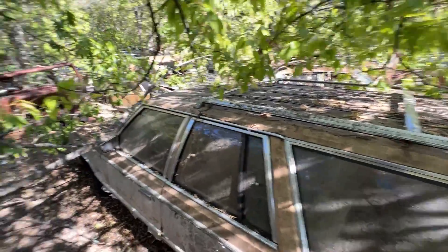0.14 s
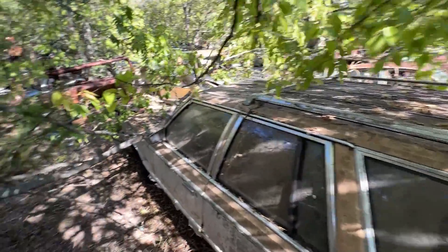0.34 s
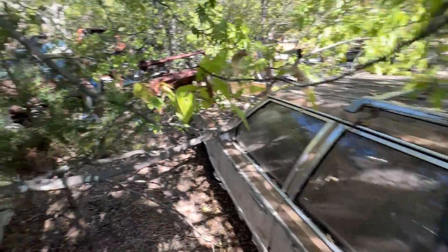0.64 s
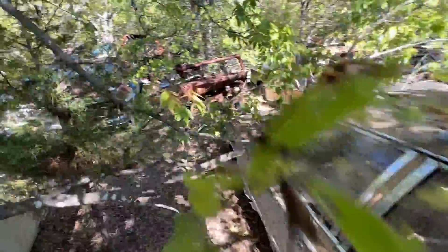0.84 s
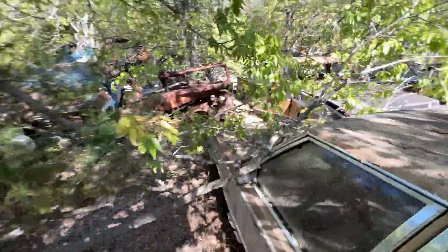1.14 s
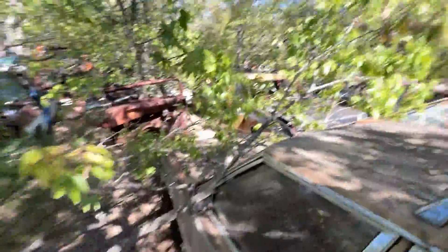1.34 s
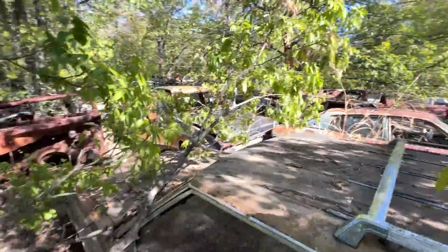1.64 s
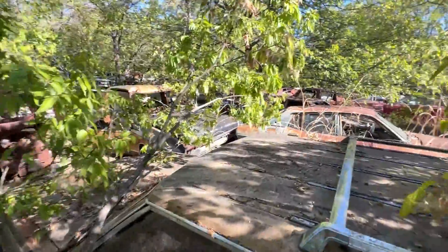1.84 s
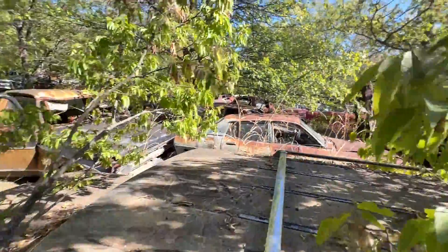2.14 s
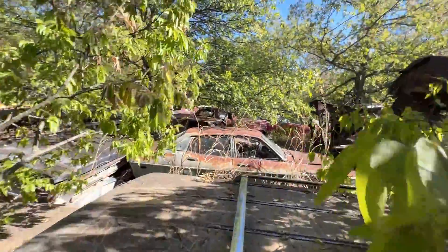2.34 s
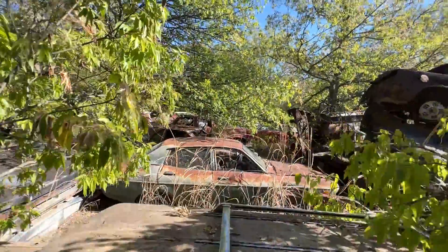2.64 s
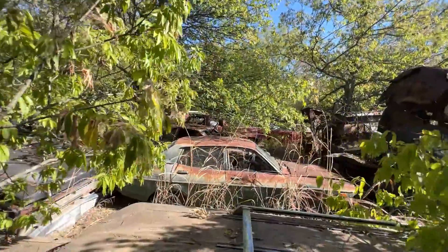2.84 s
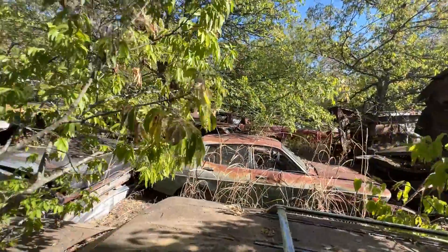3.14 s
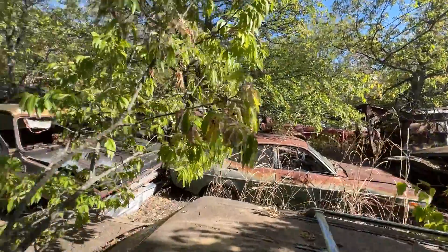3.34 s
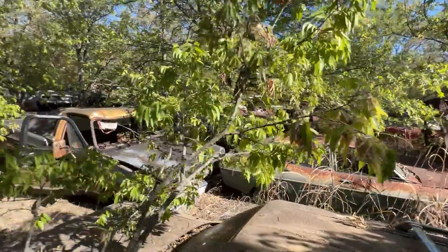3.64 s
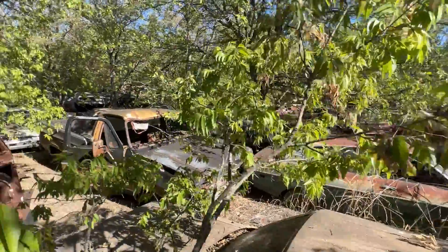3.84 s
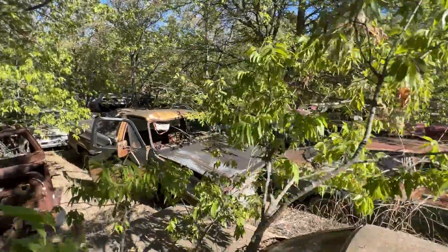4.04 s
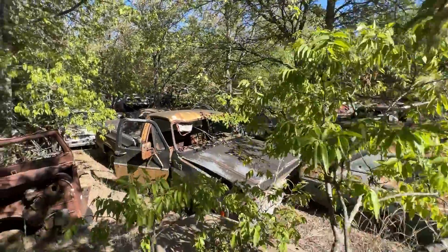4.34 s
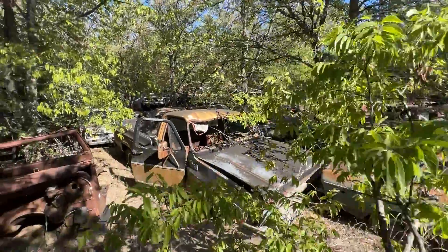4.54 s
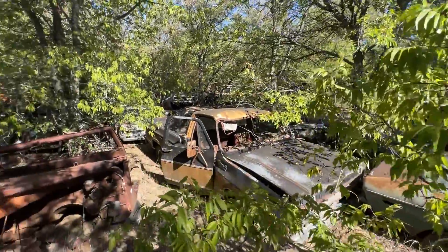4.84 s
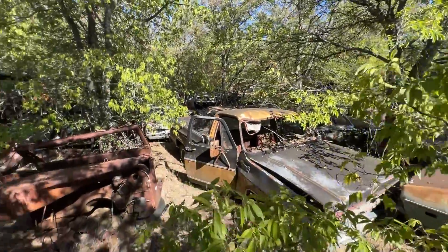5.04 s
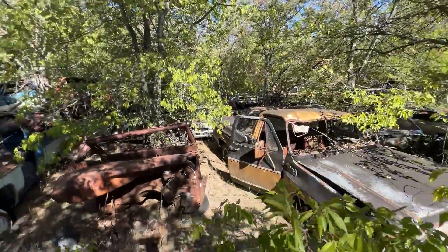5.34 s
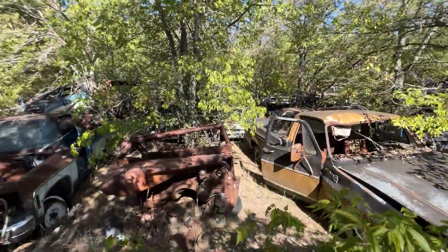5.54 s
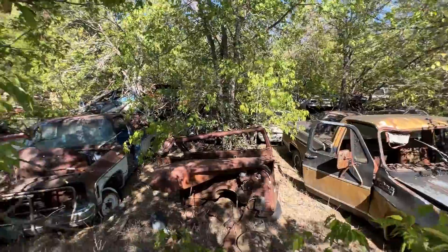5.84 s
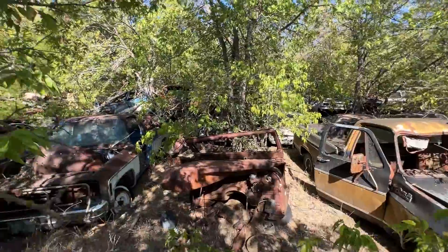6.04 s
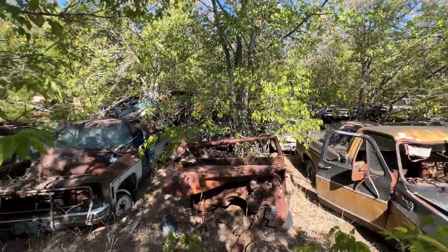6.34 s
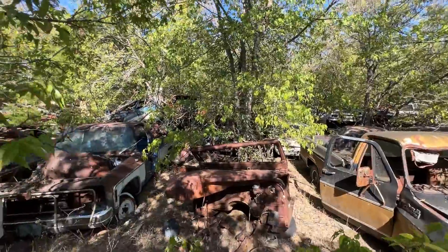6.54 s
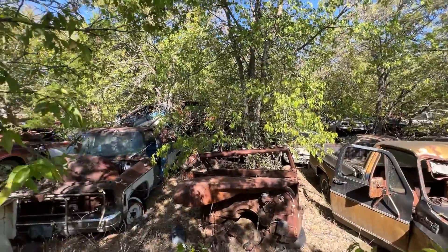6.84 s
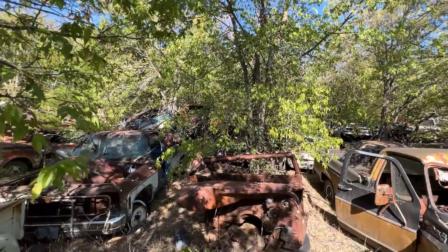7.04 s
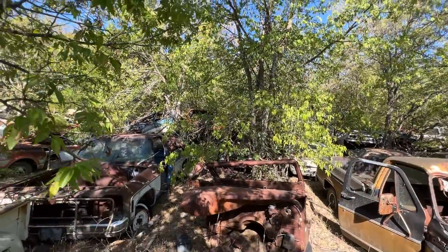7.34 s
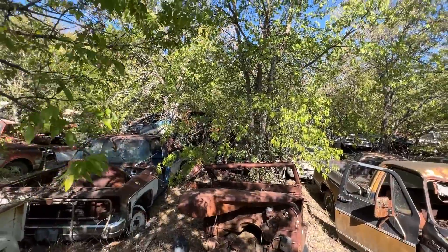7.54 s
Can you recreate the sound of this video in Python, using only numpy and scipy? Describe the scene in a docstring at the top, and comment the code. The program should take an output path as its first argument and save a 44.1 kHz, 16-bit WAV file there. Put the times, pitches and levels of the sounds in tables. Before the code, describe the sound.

Busy crackling foliage and crunching steps with knocking branches and brittle twig snaps, thinning into sparser rustles, outdoors and close to the microphone.

```python
"""An overgrown yard with wrecked cars: someone pushes through bushes, walking on dry leaves.
Leaves rustle and crackle as streams of tiny ringing clicks, coloured from crisp to crunchy over soft treads.
Twigs snap as noise bursts with a sharp tone; branches knock as damped resonances of noise.
A car panel and something hollow ring as sets of decaying modes, over quiet yard air.
The hand-held recorder has two unlike ports; most of the sound comes from the right."""
import sys
import numpy as np
from scipy import signal
from scipy.fft import rfft, irfft, next_fast_len
from scipy.io import wavfile

SR = 44100
rng = np.random.default_rng(int(sys.argv[2]) if len(sys.argv) > 2 else 0)


def int16_out(signal):
    """Quantize to a 16-bit WAV file."""
    q = np.round(np.clip(np.atleast_2d(signal).T, -1, 1) * 32767)
    wavfile.write(sys.argv[1], SR, q.astype(np.int16))


N = 339127

# Event levels are relative: the mix settings trim them, and the ports colour them.
# leaves that keep stirring between the strokes: time_s, level_db
STIRRING_BED = [(0, -59.5), (.1, -52), (.3, -42.5), (1.1, -50), (1.9, -51), (2.5, -51.5), (3.05, -52.5),
                (3.66, -55), (4.3, -52), (4.75, -55.5), (5.25, -53.5), (5.75, -52.5), (6.08, -54),
                (6.69, -60), (6.88, -61.5), (7.2, -54.5), (7.54, -64), (7.69, -60.5)]
# fine hiss of foliage close by, against the crisp rustle: time_s, level_db
FOLIAGE_HISS = [(0, -7.5), (1.35, -8.5), (1.7, -11.5), (2.6, -8), (2.82, -20), (3.1, -13), (4.03, -12),
                (5.35, -25), (6.3, -32), (6.78, -16), (7.69, -20)]
# a leafy branch sweeps past: start_s, level_db, rise_s, hold_s, t60_s,
# papery_db (large papery leaves against the crisp ones)
BRANCH_SWEEPS = [(0.105, -35, 0.12, 0.097, 1, -8), (0.4, -38, 0.044, 0.28, 1, -8),
                 (0.823, -38, 0.1, 0.098, 0.13, -7), (1.105, -48.5, 0.046, 0.045, 0.11, 1.5),
                 (1.25, -33.5, 0.0097, 0.095, .2, -12), (1.347, -27, 0.01, 0.015, 0.16, -13),
                 (1.428, -40, 0.084, 0.087, 0.86, -7.5), (1.642, -39, 0.034, 0.063, 0.87, -10),
                 (1.913, -43.5, 0.027, 0.033, .25, -11), (2.124, -46, 0.038, 0.053, .3, -5.5),
                 (2.219, -37.5, 0.037, 0.011, 0.45, -25), (2.764, -41.5, 0.031, 0.056, 0.45, -10),
                 (2.956, -46.5, .015, .02, 0.17, -6), (3.065, -44, .03, .01, 0.12, -8),
                 (3.177, -45, 0.029, 0.036, 0.13, -12), (3.313, -48, 0.1, 0.089, .5, -18),
                 (3.677, -49, 0.047, 0.41, 0.26, -8.5), (3.984, -36, 0.037, 0.031, 0.34, -7),
                 (4.09, -49.5, 0.028, 0.071, 0.99, -3.5), (5.006, -48, 0.018, 0.016, .2, -11),
                 (5.13, -52, .015, .05, 0.65, 5.5), (5.323, -33, 0.032, 0.025, .22, -8.5),
                 (6.116, -44, 0.028, 0.028, .3, -9), (6.184, -38.5, 0.043, 0.056, .4, -6.5),
                 (6.752, -49.5, 0.021, .012, 0.11, -2), (7.022, -47, 0.015, 0.015, 0.83, 1.5),
                 (7.257, -42, 0.025, 0.01, 0.28, -6.5), (7.432, -52.5, 0.029, .012, 0.14, -19)]
# a foot presses into the litter: start_s, crunch_db, rise_s, hold_s, t60_s,
# scuff_db (sole), tread_db (dull weight)
FOOTSTEPS = [(0, -71.5, 0.018, 0.081, 0.38, -69, -66.5), (0.11, -68, 0.15, 0.19, .7, -54.5, -77),
             (.42, -51, 0.06, 0.24, 1.1, -51.5, -67), (0.76, -51.5, 0.015, 0.33, 1.2, -51, -60.5),
             (1.148, -65, .03, 0.082, 0.42, -46, -57), (1.303, -33.5, 0.037, 0.025, 0.16, -48.5, -68),
             (1.414, -44.5, 0.016, 0.024, 0.58, -69, -65), (2.13, -49, 0.074, 0.084, 0.32, -58, -72),
             (2.32, -63.5, 0.034, 0.11, 0.15, -74, -70), (2.545, -56.5, 0.039, 0.054, 0.66, -62.5, -68),
             (2.883, -60, 0.015, 0.21, 1.8, -64.5, -63), (3.36, -55, 0.037, 0.037, 0.45, -64.5, -89),
             (3.978, -47, 0.024, 0.024, 0.8, -59.5, -70), (4.133, -52, .03, 0.057, .6, -61.5, -77),
             (5.288, -42, 0.056, 0.04, 0.33, -56, -63.5), (5.421, -49.5, 0.021, 0.27, 0.22, -78, -90),
             (5.86, -54, 0.036, 0.026, 0.36, -61.5, -86), (6.162, -48.5, 0.083, 0.05, .2, -65, -75),
             (6.3, -37.5, 0.018, 0.062, 0.54, -55, -70), (6.386, -41.5, 0.051, 0.13, 0.39, -51.5, -71),
             (6.73, -53, 0.042, 0.013, 0.14, -65, -71), (7.023, -56, 0.014, 0.058, 0.43, -65.5, -78),
             (7.264, -71, 0.02, .02, 0.34, -68, -75)]
# a bunch of leaves crushed at once: start_s, level_db, t60_s, tilt_db_per_octave
LEAF_CRUSHES = [(0.309, -34, 0.059, -1.5), (0.344, -22, 0.03, 11), (0.935, -26, 0.014, 17),
                (1.006, -22.5, 0.073, -1), (1.048, -23, 0.046, 1), (1.2453, -22.5, 0.064, -3.5),
                (1.344, -23, 0.14, 6.5), (3.101, -38, 0.092, 9), (3.826, -35, 0.055, 1),
                (5.325, -29.5, 0.026, 4), (5.628, -33, 0.025, -1.5), (6.146, -39, 0.094, 1),
                (6.293, -25, 0.036, -0.5), (7.028, -42, 0.27, 5.5)]
# branches knock, from bright flicks to dull thumps: start_s, level_db, pitch_hz
BRANCH_KNOCKS = [(0.309, -36, 1380), (0.675, -35, 890), (0.777, -20.5, 1700), (0.7794, -24.5, 710),
                 (0.783, -36.5, 297), (0.925, -26, 1900), (0.936, -23.5, 1860), (0.938, -27.5, 590),
                 (0.967, -38.5, 140), (1.009, -27.5, 1250), (1.012, -35, 424), (1.054, -25, 1350),
                 (1.115, -35, 1500), (1.190, -23.5, 2000), (1.194, -27, 241), (1.226, -31, 1030),
                 (1.231, -27, 900), (1.242, -31.5, 200), (1.248, -23, 610), (1.259, -27, 614),
                 (1.261, -28, 4070), (1.307, -28.5, 1570), (1.344, -25, 1250), (1.598, -38.5, 1080),
                 (3.107, -40, 1430), (2.112, -46, 3700), (3.185, -44.5, 1550), (3.289, -47.5, 3870),
                 (3.59, -46, 1160), (4.18, -38, 1250), (4.652, -44, 1060), (4.655, -50, 280),
                 (4.724, -38, 1350), (5.121, -23.5, 3340), (5.63, -35, 3700), (6.315, -34, 1510),
                 (7.205, -34, 3400)]
# twigs breaking: start_s, level_db, tilt_db_per_octave (limited when played)
TWIG_SNAPS = [(0.6721, -22.5, -4), (0.773, -11.5, 9), (0.778, -17.5, -5), (1.2586, -18, 9), (1.898, -31, 3),
              (1.992, -35, 3), (2.0522, -35, 5), (2.086, -37, -1), (2.8931, -19, -0.5), (2.9674, -25, -0.5),
              (3.182, -32.5, 8), (3.239, -28, -1), (3.884, -20, 2.5), (4.1385, -23.5, 0.5),
              (4.2244, -33, -3.5), (4.2936, -27.5, 4), (4.5015, -34.5, 5), (4.602, -33, 1),
              (4.7214, -31.5, -0.5), (4.8678, -40, 0), (4.8912, -34.5, 3), (5.012, -36, 9),
              (5.0618, -26, 4), (5.1005, -31, 3), (5.1215, -9, 2.5), (5.626, -27, 5), (6.3129, -23, -4.5),
              (7.205, -36, 0), (7.232, -31, 7), (7.458, -46, 1.5), (7.563, -40, 11), (7.6093, -45, -1)]
# bumps on a car's sheet metal: start_s, level_db
PANEL_BUMPS = [(2.62, -57.5), (2.893, -36), (2.969, -44.5), (3.107, -58), (3.238, -60), (7.11, -61)]
# modes of the sheet metal: pitch_hz, level_db, t60_s
PANEL_MODES = [(88.8, -29, 0.96), (129.7, -18, 0.28), (164.3, -4.5, 0.18), (185.4, -9, 0.35),
               (395, -9, 0.13), (431, -6, 0.2), (715, -8, .06), (810, 1, 0.065), (1020, -6, 0.075),
               (1447, 2, 0.061), (1866, 3, 0.045), (2755, 13.5, 0.026), (3620, 7, 0.032), (4200, -11, 0.03)]
# a foot coming down on something hollow: start_s, level_db
HOLLOW_THUDS = [(4.05, -32), (4.13, -48)]
# modes of the hollow body: pitch_hz, level_db, t60_s
HOLLOW_MODES = [(213, -21, 0.064), (333, -7, 0.078), (394, -13, 0.048), (481, -5, 0.091)]

# Spectra, relative because each coloured sound is levelled to rms 1: frequency_hz, level_db (per Hz)
# crisp small leaves
CRISP_SPECTRUM = [(2500, -54), (4000, -23), (5000, -1), (7000, 4.5), (9000, 8), (10000, -7.5),
                  (12000, -30.5)]
# large papery leaves
PAPERY_SPECTRUM = [(1500, -33), (2400, 2), (3500, 4), (4400, 0.5), (5500, -10), (7000, -13.5)]
# litter crunching underfoot
CRUNCH_SPECTRUM = [(450, -30.5), (800, -3.5), (1200, 2.5), (1700, 4.5), (2400, -10.5), (4000, -30)]
# fine foliage hiss
FINE_SPECTRUM = [(8500, -22), (10200, -2), (11500, -1), (13500, 1.5), (16000, -7)]
# scuffing soles
SCUFF_SPECTRUM = [(110, -11), (180, -1.5), (290, 3.5), (420, 0.5), (600, 0), (800, -2.5), (1100, -9),
                  (1800, -53)]
# dull weight of the feet
TREAD_SPECTRUM = [(20, -26), (50, 5.5), (85, 7), (130, 4), (210, -1), (300, -6), (600, -24)]
# breaking leaves and twig fibres
BREAKING_SPECTRUM = [(100, -19), (600, -7.5), (1400, -1.5), (2500, 0.5), (5000, 2), (8800, 9.5),
                     (10500, -4), (16000, -10.5)]
# background air of the yard
AIR_SPECTRUM = [(20, -13), (70, 5.5), (300, 8), (1200, 7), (3000, -15), (8000, -14), (16000, -18)]

# resonances of the left microphone port: frequency_hz, width_hz, level_db
LEFT_RESONANCES = [(5720, 1400, -6), (8000, 170, -27), (10100, 220, 1.5), (10530, 290, -9.5)]
# resonances of the right microphone port: frequency_hz, width_hz, level_db
RIGHT_RESONANCES = [(580, 40, 5), (1700, 490, 2.5), (5323, 145, -8), (5620, 110, 8), (7477, 161, -41),
                    (9750, 120, -11), (10800, 156, 5)]
# balance between the ports: frequency_hz, right_louder_db, likeness (0-1)
PORT_BALANCE = [(51.3, 1, 0), (150, 2, 0.17), (280, 0.5, 0.04), (517, -2.5, 0), (800, 0, 0.63),
                (1250, 3.5, 0.64), (2480, 3, 0), (5200, 10.5, 0.06), (5120, 8.5, 0.45), (8350, 8, 0.7),
                (8830, 0, 0), (11040, -5, 0.12), (11100, 3, 0.77), (13200, -2.5, 1), (15800, 3, 1)]
# phase between the ports: frequency_hz, left_leads_rad
PORT_PHASE = [(210, 3.1), (520, 2.4), (800, -.9), (1250, -.3), (4800, -1.4), (5900, -2.2), (7200, -1.7),
              (9200, -4.2), (11100, -.3), (12350, .1), (14200, 3.1), (15700, 4.3)]

CLICK_SPREAD_DB = 4.0
CRUSH_RISE_S = 0.0006
KNOCK_T60_S, KNOCK_SLOPE = 0.031, .4  # ring at 1 kHz; low knocks ring longer by this power of the pitch
SNAP_T60_S, SNAP_HALVING_DB = 0.018, 23  # burst at a -30 dB level; half as long for each such step up
SPLINTER_DB = -18  # against the burst of the snap
CUTOFF_HZ = 15900


def from_db(db):
    """Turns decibels into amplitude."""
    return 10 ** (np.asarray(db) / 20)


def rms_one(x):
    """Levels a sound to rms 1."""
    return x / np.sqrt(np.mean(x ** 2) + 1e-20)


def in_time(rows):
    """The columns of a curve, sample by sample."""
    s, *columns = np.transpose(rows)
    return [np.interp(np.arange(N) / SR, s, c) for c in columns]


def at_hz(rows, hz):
    """The columns of a spectrum, read on a log-frequency axis."""
    points, *columns = np.transpose(rows)
    return [np.interp(np.log(hz + 1), np.log(points), c) for c in columns]


def coloured(x, spectrum, tilt_db=0):
    """Filters x with a spectrum, tilted by so many dB per octave; rms 1."""
    size = next_fast_len(x.shape[-1], True)
    hz = np.fft.rfftfreq(size, 1 / SR)
    gain = from_db(at_hz(spectrum, hz)[0] + tilt_db * np.log2(hz + 1))
    return rms_one(irfft(rfft(x, size) * gain, size)[:, :x.shape[-1]])


def drift(rate):
    """A random wander through so many new values a second; rms 1."""
    knots = rng.standard_normal(N // 20)
    return rms_one(np.interp(np.arange(N) / SR * rate, np.arange(len(knots)), knots))


def add(out, s, sound):
    """Mixes a sound in at time s."""
    i = max(round(s * SR), 0)
    out[:, i:i + sound.shape[-1]] += sound[..., :N - i]


def swell(t, rise, t60):
    """A straight rise to 1, then an exponential decay."""
    return np.minimum(t / rise, 1) * from_db(-60 * np.maximum(t - rise, 0) / t60)


def stroke(s, rise, hold, t60):
    """Power of one movement: it builds up, holds and dies away."""
    t = np.arange(N) / SR - s
    decay = from_db(-60 * np.clip(t - rise - hold, 0, 3 * t60) / t60)
    return (np.clip(t / rise, 0, 1) * decay) ** 2


def stirring(bed_papery_db, bed_crunch_db, bed_scuff_db, bed_tread_db,
             swish_crunch_db, step_crisp_db, step_papery_db):
    """Crisp, papery, crunch, scuff and tread levels in dB: each sweep and each step feeds several."""
    bed_db = np.array([[0], [bed_papery_db], [bed_crunch_db], [bed_scuff_db], [bed_tread_db]])
    power = from_db(in_time(STIRRING_BED)[0] + bed_db) ** 2
    for s, db, rise, hold, t60, papery_db in BRANCH_SWEEPS:
        sweep_db = [db, db + papery_db, db + swish_crunch_db]
        power[:3] += np.outer(from_db(sweep_db) ** 2, stroke(s, rise, hold, t60))
    for s, db, rise, hold, t60, scuff_db, tread_db in FOOTSTEPS:
        step_db = [db + step_crisp_db, db + step_papery_db, db, scuff_db, tread_db]
        power += np.outer(from_db(step_db) ** 2, stroke(s, rise, hold, t60))
    return 10 * np.log10(power)


def crackle(per_s, clump_db, leaf_t60, count=14):
    """Leaves buckle in clumps of tiny clicks; each click rings one of a few leaves, unlike at each port."""
    spread = CLICK_SPREAD_DB * np.minimum(rng.standard_normal(N), 2.6)
    sizes = from_db(spread + clump_db * drift(220))
    clicks = sizes * rng.choice([-1, 1], N) * (rng.random(N) < per_s / SR)
    dealt = rng.integers(0, count, N)  # which leaf each click rings
    t = np.arange(512) / SR
    leaves = rng.standard_normal((count, 2, len(t))) * from_db(-60 * t / leaf_t60)
    out = np.zeros((2, N))
    for k, leaf in enumerate(leaves):
        out += signal.oaconvolve((clicks * (dealt == k))[None], leaf, axes=1)[:, :N]
    return rms_one(out)


def ticks(per_s, ring_cycles, count=40):
    """Stiff stalks and curled leaves tick now and then, each ringing at one of a set of pitches; rms 1."""
    out = np.zeros((2, N))
    clicks = (rng.random(N) < per_s / SR) * rng.uniform(0.72, 1, N)
    dealt = rng.integers(0, count, N)
    t = np.arange(SR // 16) / SR
    for k, hz in enumerate(np.geomspace(1300, 8800, count)):
        ring = np.sin(2 * np.pi * (hz * t + rng.random((2, 1)))) * swell(t, 3 / hz, ring_cycles / hz)
        for i in np.flatnonzero(clicks * (dealt == k)):
            add(out, i / SR, clicks[i] * np.sqrt(hz) * ring)
    return rms_one(out)


def rustle(crisp_db, papery_db, crunch_db, fine_db, tread_db, scuff_db, flicker_db, flutter_db):
    """One stream of leaf clicks shifts in colour as its voices flicker; stalks tick, feet tread under it."""
    crisp, papery, crunch, scuff, tread = stirring(
        bed_papery_db=-8, bed_crunch_db=-6.5, bed_scuff_db=-23, bed_tread_db=-33.5,
        swish_crunch_db=-16, step_crisp_db=2, step_papery_db=-2)
    fine = crisp + in_time(FOLIAGE_HISS)[0]
    grains = crackle(per_s=5000, clump_db=1.08, leaf_t60=0.0077, count=32)
    grains = grains * from_db(flutter_db * drift(45))
    voices = [(crisp + crisp_db, CRISP_SPECTRUM), (papery + papery_db, PAPERY_SPECTRUM),
              (crunch + crunch_db, CRUNCH_SPECTRUM), (fine + fine_db, FINE_SPECTRUM),
              (scuff + scuff_db, SCUFF_SPECTRUM)]
    leaves = np.zeros((2, N))
    for db, spectrum in voices:
        leaves += from_db(db + flicker_db * drift(110)) * coloured(grains, spectrum)
    stalks = from_db((crisp + crunch) / 2 - 10.0) * ticks(per_s=130, ring_cycles=290)
    weight = coloured(rng.standard_normal((2, N)), TREAD_SPECTRUM)
    feet = from_db(tread + tread_db + 3.3 * drift(40)) * weight
    return leaves + stalks + feet


def yard_air(level_db):
    """The background of the yard is steady noise, weighted to the lows and mids."""
    return from_db(level_db) * coloured(rng.standard_normal((2, N)), AIR_SPECTRUM)


def crushes(level_db):
    """Many leaves give way at once: a dense flurry of clicks that dies out."""
    out, t = np.zeros((2, N)), np.arange(SR // 3) / SR
    grains = crackle(per_s=11000, clump_db=0.5, leaf_t60=0.017)
    for s, db, t60, tilt_db in LEAF_CRUSHES:
        flurry = coloured(grains[:, round(s * SR):][:, :len(t)], BREAKING_SPECTRUM, tilt_db)
        shape = swell(t, CRUSH_RISE_S, t60)[:flurry.shape[-1]]
        add(out, s, from_db(db + level_db) * flurry * shape)
    return out


def knocks(level_db, width):
    """Green wood answers a blow with one broad, quickly damped resonance, its width a share of the pitch."""
    out, t = np.zeros((2, N)), np.arange(SR // 5) / SR
    for s, db, hz in BRANCH_KNOCKS:
        t60 = KNOCK_T60_S * (1000 / hz) ** KNOCK_SLOPE
        shape = swell(t, 0.0014, t60)
        strike = rng.standard_normal((2, len(t))) * shape
        blow = signal.lfilter(*signal.iirpeak(hz, 1 / width, fs=SR), strike)
        add(out, s, from_db(db + level_db) * rms_one(blow) * np.sqrt(np.mean(shape ** 2)))
    return out


def snaps(level_db, crack_db, crack_hz, splinter_t60):
    """A twig breaks with one sharp crack inside a burst of tearing fibres, which splinter briefly after."""
    out, t = np.zeros((2, N)), np.arange(SR // 10) / SR
    # cubing the swell makes the crack die three times as fast
    crack = from_db(crack_db) * np.sin(2 * np.pi * crack_hz * t) * swell(t, .0008, .002) ** 3
    for s, db, tilt_db in TWIG_SNAPS:
        t60 = SNAP_T60_S * .5 ** ((db + 30) / SNAP_HALVING_DB)
        shape = swell(t, .001, t60) + from_db(SPLINTER_DB) * swell(t, .002, splinter_t60)
        noise = rng.standard_normal((2, len(t)))
        fibres = shape * coloured(noise, BREAKING_SPECTRUM, np.clip(tilt_db, -2, 9))
        add(out, s, from_db(db + level_db) * (crack + fibres))
    return out


def struck(hits, modes, build_cycles, looseness):
    """Each hit rings all modes of a body; a loose one wavers in pitch, and low modes build up slower."""
    out, t = np.zeros((2, N)), np.arange(SR // 2) / SR
    quarter_turn = np.array([[0], [1 / 4]])  # right ahead of left, in cycles
    for s, db in hits:
        for hz, mode_db, t60 in modes:
            waver = looseness * np.interp(t, np.linspace(0, .5, 30), rng.standard_normal(30))
            wave = np.sin(2 * np.pi * (hz * t + waver + rng.random() + quarter_turn))
            # squaring rounds the onset; the doubled t60 makes up for it
            add(out, s, from_db(db + mode_db) * wave * swell(t, build_cycles / hz, 2 * t60) ** 2)
    return out


def yard(x, scatter_db, t60):
    """Trunks and car bodies throw back a short, thin scatter."""
    t = np.arange(SR // 2) / SR
    echoes = rng.standard_normal((2, len(t))) * swell(t, 0.00067, t60)
    echoes /= np.sqrt(np.sum(echoes ** 2, axis=1, keepdims=True))
    return x + from_db(scatter_db) * signal.oaconvolve(x, echoes, axes=1)[:, :N]


def port(x, resonances):
    """A microphone port colours the sound with a chain of peaks and notches."""
    for hz, width, db in resonances:
        a, k, c = from_db(db / 2), np.pi * width / SR, -2 * np.cos(2 * np.pi * hz / SR)
        x = signal.lfilter([1 + k * a, c, 1 - k * a], [1 + k / a, c, 1 - k / a], x)
    return x


def scene():
    """Mixes leaves, wood and struck bodies, scattered by the yard, over its air."""
    leaves = rustle(crisp_db=-0.5, papery_db=-4, crunch_db=-4.0, fine_db=2.5, tread_db=3.0,
                    scuff_db=-1.0, flicker_db=1.15, flutter_db=1.0)
    leaves = leaves + crushes(level_db=1.0)
    wood = knocks(level_db=0.0, width=0.44)
    wood = wood + snaps(level_db=-4.5, crack_db=-4, crack_hz=4540, splinter_t60=0.16)
    panel = struck(PANEL_BUMPS, PANEL_MODES, build_cycles=8.3, looseness=0.068)
    hollow = struck(HOLLOW_THUDS, HOLLOW_MODES, build_cycles=1.9, looseness=0.055)
    outdoors = yard(leaves + wood + panel + hollow, scatter_db=-15, t60=.3)
    return outdoors + yard_air(level_db=-67.0)


def record(dry):
    """The ports share part of the sound, out of step; each has its own colour; deep bass and top are cut."""
    size = next_fast_len(N, True)
    hz = np.fft.rfftfreq(size, 1 / SR)
    right_db, alike = at_hz(PORT_BALANCE, hz)
    lead = at_hz(PORT_PHASE, hz)[0]
    alike = np.clip(alike, 0, 1)
    left, own = rfft(dry, size)
    shared = alike * left + np.sqrt(1 - alike ** 2) * own
    right = irfft(shared * from_db(right_db) * np.exp(-1j * lead), size)[:N]
    pair = np.array([port(dry[0], LEFT_RESONANCES), port(right, RIGHT_RESONANCES)])
    pair = signal.sosfilt(signal.butter(2, 42, "high", fs=SR, output="sos"), pair)
    return signal.sosfilt(signal.ellip(10, .2, 70, CUTOFF_HZ, fs=SR, output="sos"), pair)


dry = scene()
out = record(dry)
int16_out(out)
```